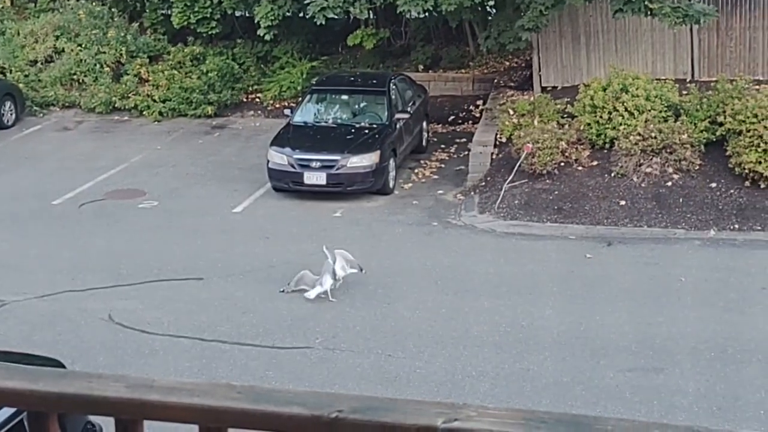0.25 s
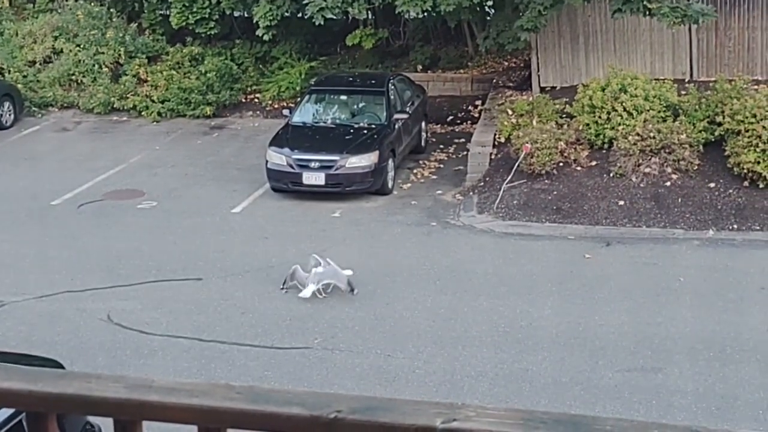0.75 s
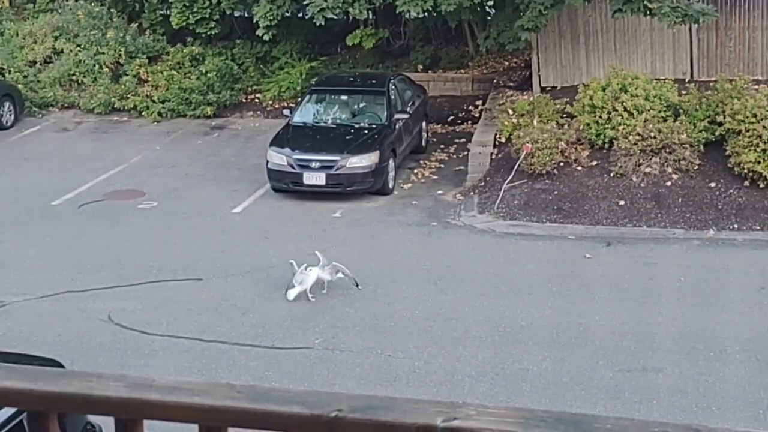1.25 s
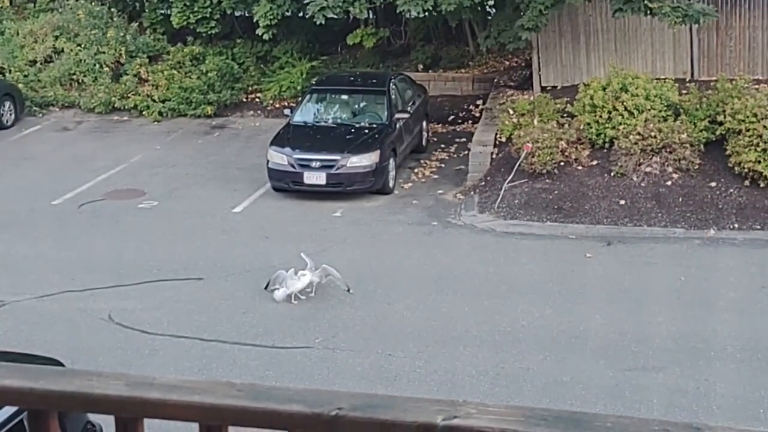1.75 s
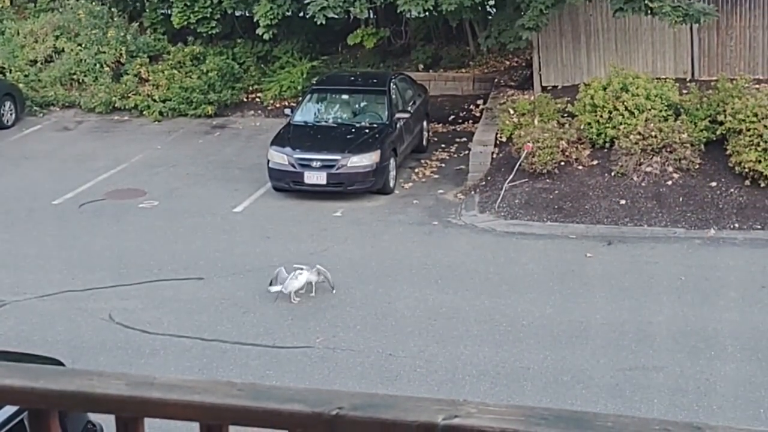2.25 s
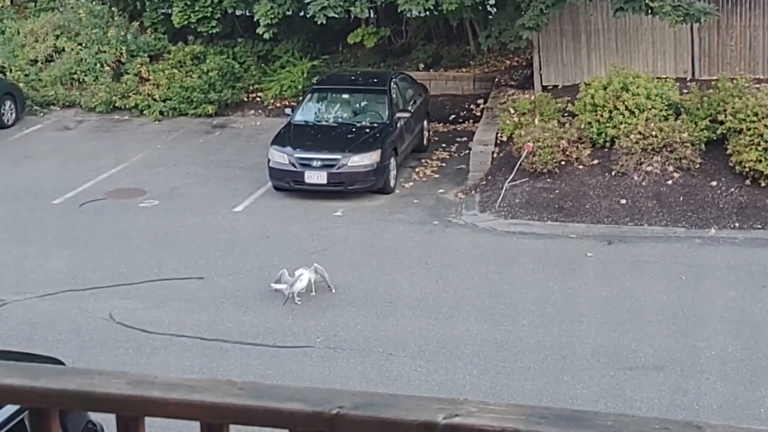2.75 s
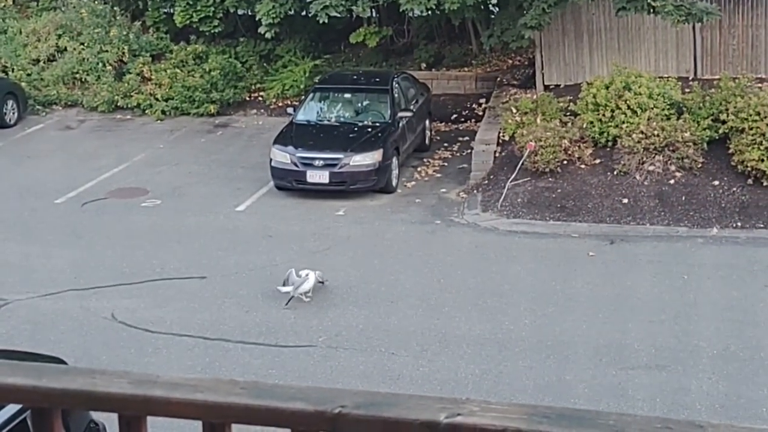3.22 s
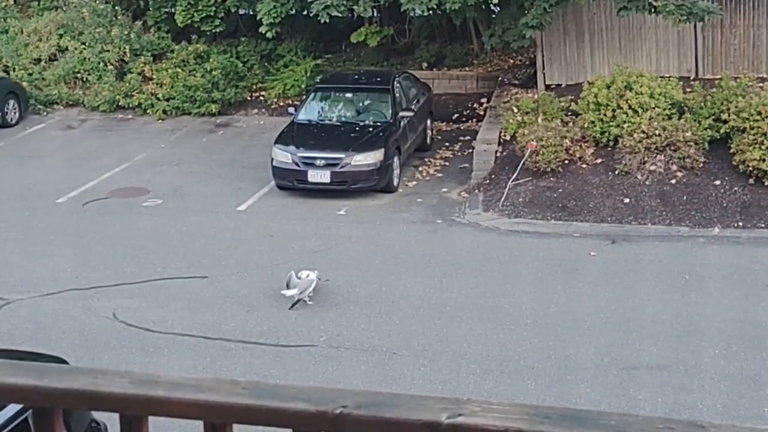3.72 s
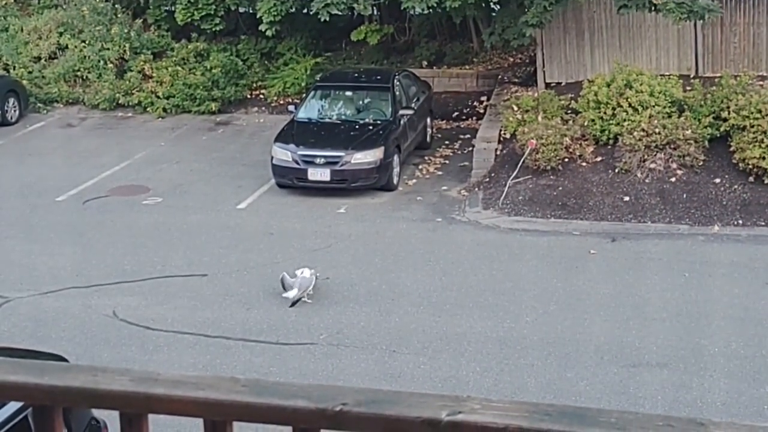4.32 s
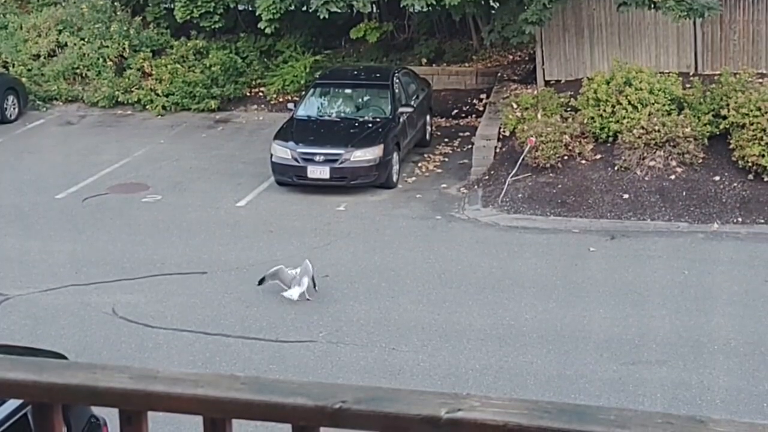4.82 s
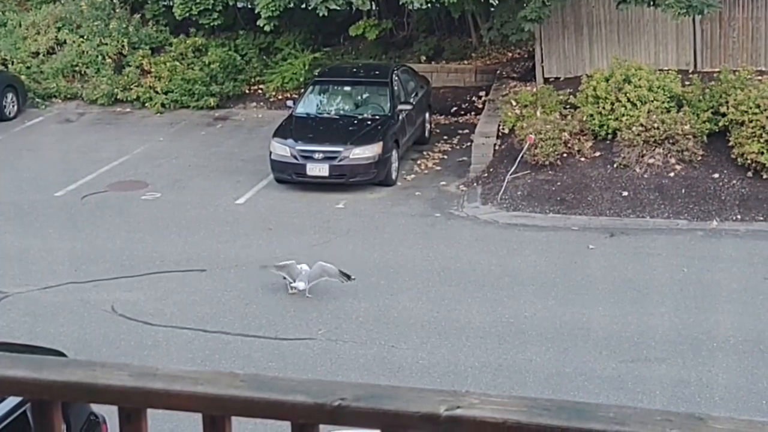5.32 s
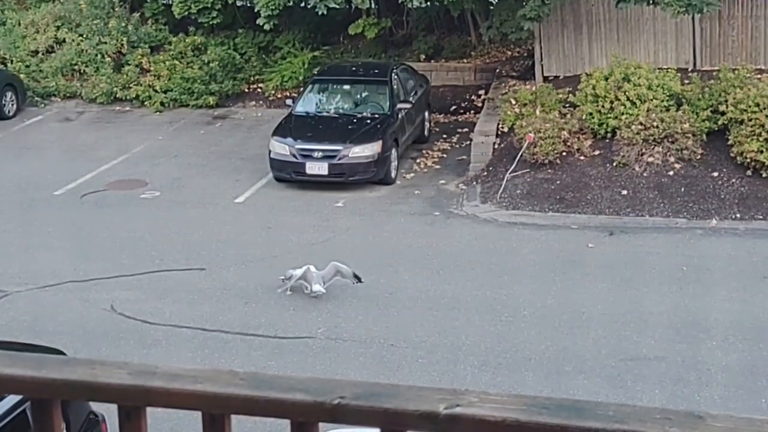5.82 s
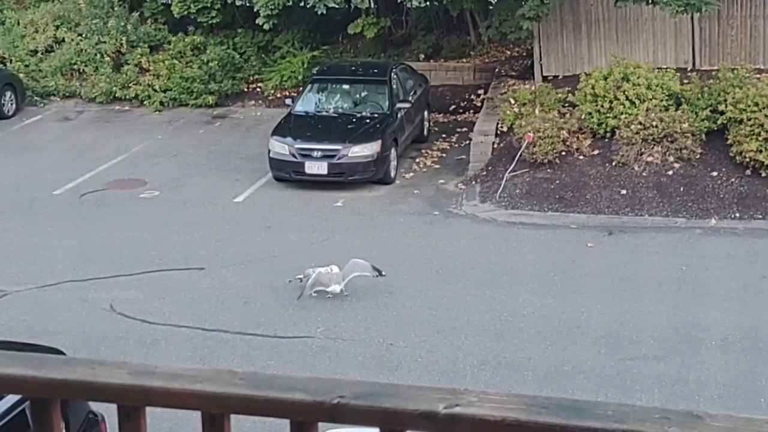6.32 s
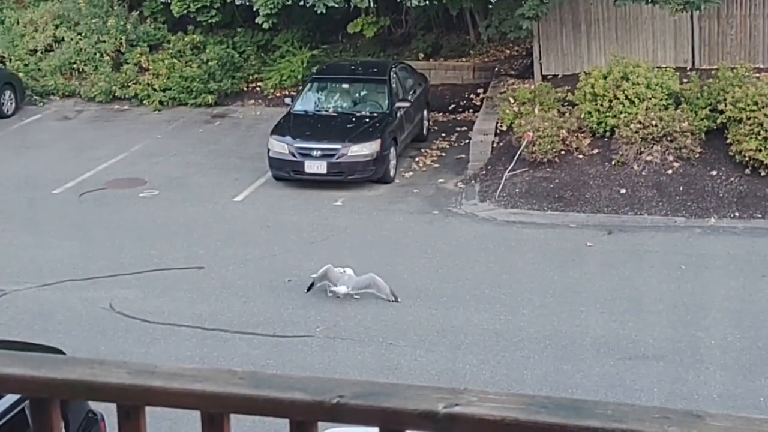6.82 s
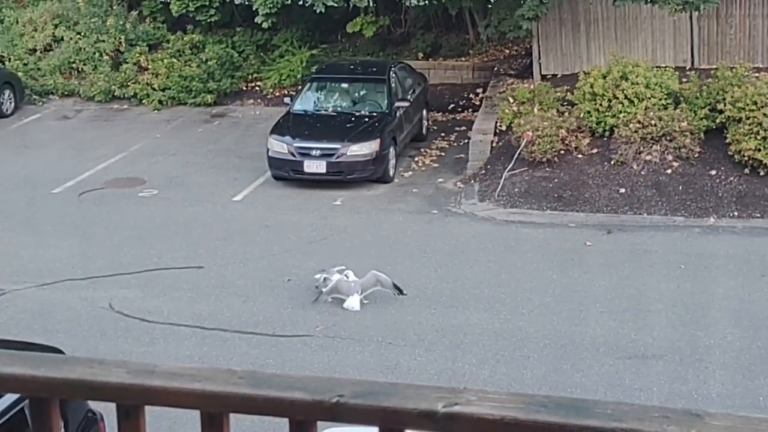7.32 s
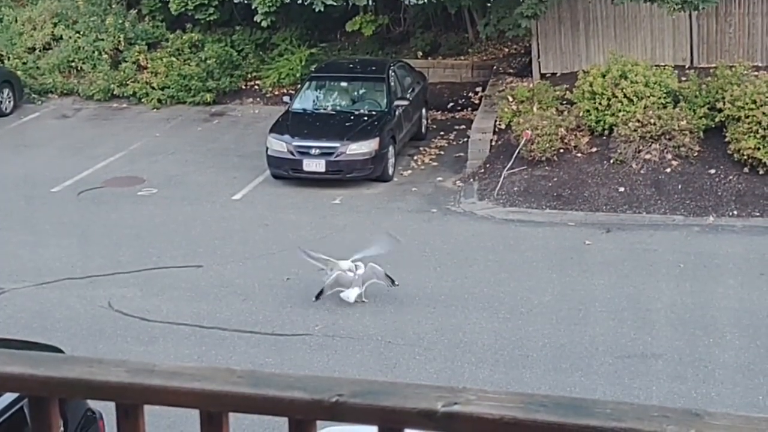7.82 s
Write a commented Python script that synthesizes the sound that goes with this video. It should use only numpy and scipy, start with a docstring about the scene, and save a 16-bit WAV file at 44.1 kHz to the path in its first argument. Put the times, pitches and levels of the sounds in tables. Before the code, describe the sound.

Outdoor stereo pickup from above a parking lot. A wing slap with a hard little knock comes first, then five separate bursts of quick gull yelps, nasal and rough at the start, dropping at the end, with short reverberant tails. Between them are quiet feather rustles, tiny bird chips and, near the end, falling whistles. Distant traffic and leaves stay very low.

```python
"""A gull yelps in runs of two or three short cries as two gulls wrestle on an asphalt lot below a balcony.
Each cry is a stack of sine lines that starts hoarse, breaks into a clean note and frays as it sinks.
Walls and fences throw it back as smeared echoes and a fading tail of noise. Small birds whistle and chip
with sliding sines, wings slap and rustle as puffs of noise, and a beak knocks as a few ringing sines.
Under it all, shaped noise makes distant traffic hum and leaves hiss."""
import sys
import numpy as np
from scipy import signal
from scipy.fft import rfft, irfft, next_fast_len
from scipy.io import wavfile
from scipy.ndimage import uniform_filter1d, map_coordinates

SR = 44100
rng = np.random.default_rng(int(sys.argv[2]) if len(sys.argv) > 2 else 0)


def dump_mix(stems):
    """Bounce the given channels to the path in sys.argv[1] as a 16-bit WAV at rate SR."""
    frames = np.atleast_2d(stems).T  # one column per channel
    limited = np.clip(frames, -1, 1)  # hard clip at full scale
    pcm = np.round(limited * 32767).astype(np.int16)
    wavfile.write(sys.argv[1], SR, pcm)


N = 355446  # samples in the scene

# Far traffic and leaves over time: t/s, traffic level/dB, leaves level/dB (both before small random drifts)
TOWN_LEVELS = [(0.0, -61, -74.5), (3.72, -59.5, -77), (8.06, -60.5, -74.5)]
# Tone colour of the traffic, only the shape counts: f/Hz, density level/dB per Hz
TRAFFIC_COLOUR = [(15, -57), (25, -24.5), (53, -14.5), (73, -6.5), (97, 1), (172, -5.5), (528, -8),
                  (592, -10.5), (1290, -13), (2570, -21), (6000, -35), (7800, -72), (13200, -120)]
# Tone colour of the leaves, only the shape counts: f/Hz, density level/dB per Hz
LEAF_COLOUR = [(2060, -19), (3500, -4.5), (5870, -7.5), (6480, -5), (10300, -7.5), (15500, -16)]
# How alike the town is on left and right, before TOWN_BALANCE: f/Hz, likeness/0-1
TOWN_LIKENESS = [(60, 0.84), (180, 0.99), (350, 0.79), (700, 0.3), (1400, 0.025)]
# Left and right balance of the town: f/Hz, left minus right level/dB, left leads by phase/rad
TOWN_BALANCE = [(45, -16, 0.56), (89, -4.5, 0.57), (178, -4, 0.19), (346, -2.5, 0.28), (1420, -5, 0.027),
                (4520, -1, 0)]
# Wing slaps and rustles: t/s, level before rise and decay/dB rms, centre f/Hz, width/octaves,
# rise time/s, time to fall 60 dB/s
WING_PUFFS = [(0.7197, -64, 6000, 1.5, 0.0011, 0.11), (.722, -53.5, 1490, 1.44, 0.0019, 0.15),
              (3.27, -71, 10000, 1, .01, 0.13), (5.051, -73, 8900, .8, 0.015, 0.42),
              (5.116, -66.5, 7100, 0.56, .006, 0.63), (6.163, -72, 9050, 1.3, 0.0037, .1),
              (7.251, -67.5, 11000, .5, .003, 0.1), (7.268, -73, 10700, .5, .003, .1),
              (8.015, -69, 7900, 0.71, .004, 0.14)]
# Ringing modes of the beak's knock: f/Hz, starting level/dB, time to fall 60 dB/s
PECK_MODES = [(840, -57, 0.079), (2080, -53, 0.054), (2730, -57, 0.045), (7600, -60, 0.011)]
# Gull cries, one a row: start t/s, length/s of the hoarse opening, clean note and sinking end,
# pitch f/Hz at the break, of the note and as it frays,
# level/dB of the note's own line at the break, in the note and as it frays,
# level/dB of the octave (2x) in the note and as it frays, base level/dB of the twelfth (3x),
# level/dB of the 1.5x line at the break and as it frays,
# level/dB of the 2.5x line at the break and in the note, noisy share of the opening/0-1
GULL_CRIES = [ (.866, 0.037, 0.01, 0.041, 1205, 1174, 1080, -50, -39.5, -44.5, -63, -62, -54.5, -51, -44, -63, -51, 1),
              (1.021, .014, 0.021, 0.05, 1150, 1166, 1085, -39.5, -36, -39.5, -44.5, -64, -47.5, -50, -43.5, -44.5, -51, 0.4),
              (2.58, .014, 0.023, 0.041, 1159, 1260, 1140, -45.5, -44, -40.5, -56, -62, -63.5, -47.5, -51.5, -57.5, -47.5, 0.45),
              (2.718, 0.028, 0.019, 0.035, 1150, 1115, 1044, -36.5, -38.5, -41.5, -52, -60, -52.5, -62, -53.5, -46, -55, 0.2),
              (2.85, 0.023, 0.019, 0.033, 1116, 1103, 980, -36.5, -37, -47, -44.5, -48.5, -48.5, -43, -48.5, -42.5, -67, .35),
              (3.708, 0.027, 0.021, 0.049, 1226, 1272, 1136, -53, -39, -41.5, -43.5, -44.5, -54.5, -45, -44, -54.5, -64, 0.62),
              (3.854, 0.033, 0.017, 0.044, 1218, 1200, 1067, -38.5, -41, -41, -37, -43, -50, -40.5, -45, -52.5, -61, 0.7),
              (3.99, .026, .012, 0.047, 1177, 1200, 1110, -38, -38.5, -39, -37.5, -42, -53, -36.5, -46, -48, -58, 0.7),
              (5.682, 0.0225, 0.0227, 0.0425, 1247, 1260, 1100, -46, -41, -45.5, -48.5, -45.5, -58, -43, -54, -52, -85, 0.44),
              (5.82, .018, 0.027, 0.029, 1223, 1175, 1136, -39.5, -46.5, -39, -47, -43.5, -57, -41.5, -47, -56.5, -75, 0.2),
              (5.952, 0.023, 0.027, 0.032, 1193, 1183, 1105, -37, -37, -39.5, -44, -43.5, -46, -38, -46, -65, -70, 0.52),
              (6.767, 0.024, 0.0087, 0.043, 1243, 1270, 1186, -50, -43.5, -46, -37.5, -45.5, -66, -48.5, -61, -49.5, -72, 0.84),
              (6.92, .022, 0.023, 0.047, 1157, 1235, 1166, -44.5, -44, -43.5, -37.5, -40.5, -52.5, -50.5, -52, -46.5, -67, 0.5),
              ]
# Further lines that follow another, mostly higher ones (0.5x follows 1.5x): multiple of the note/x, multiple of
# the line it follows/x
UPPER_LINES = [(.5, 1.5), (3.5, 2.5), (4, 3), (4.5, 2.5), (5, 3), (5.5, 2.5), (6, 3)]
# One value for each row of UPPER_LINES: level relative to the line it follows/dB
UPPER_LEVELS = [-24, -13.5, -12, -35, -18.5, -33.5, -28.5]
# Twelfth relative to its base: level/dB at start, break, note, fray and end
TWELFTH_SHAPE = [-18.5, -4.5, 0.5, -6, -21.5]
# Tone colour of the gull's breath, only the shape counts: f/Hz, density level/dB per Hz
BREATH_COLOUR = [(30, -41), (120, -28), (300, -6.5), (700, -8), (1600, -7), (3000, -14), (5000, -15.5),
                 (9000, -24), (15000, -62)]
# Left and right balance of the gull's direct sound: f/Hz, left minus right level/dB, left leads by phase/rad
GULL_BALANCE = [(150, -11, .4), (403, 13, 0.69), (1170, -9, 0.68), (1710, -1, 0.24), (2410, 0.5, 2.23),
                (3450, 3.5, 0.28), (5100, -2.5, 2.33), (6000, 1.5, 1.26)]
# Single wall echoes: delay t/s, level before each source's own offset/dB, left minus right level/dB
WALL_ECHOES = [(.012, -7, 8.5), (.03, -15, -9), (.05, -11.5, 1), (.076, -13, -5), (.13, -25.5, 1.5)]
# Fading of the yard's tail: f/Hz, time to fall 60 dB/s
YARD_FADE = [(300, 0.93), (1200, 0.66), (2500, 0.79), (5000, 0.99), (10000, 0.25)]
# Falling whistles of a small bird: t/s, length/s, top f/Hz, bottom f/Hz, level before swell and placing/dB rms
BIRD_WHISTLES = [(6.64, .068, 4600, 3050, -70), (6.768, .075, 4800, 2900, -65),
                 (6.89, .05, 4700, 3300, -74), (7.008, .06, 4800, 3400, -67),
                 (7.125, .065, 4750, 3250, -72)]
# Quick chips of a far bird: t/s, length/s, first f/Hz, last f/Hz, level before swell and echo/dB rms
BIRD_CHIPS = [(1.832, .012, 6960, 6000, -68), (4.92, 0.0046, 7960, 5660, -57),
              (7.719, 0.0098, 5660, 7600, -61.5)]

PECK_S = .7205  # time of the knock, s
FRAY_AT = 0.482  # share of the sinking end after which the half lines are back
START_PITCH, END_PITCH = .88, .89  # ratios: first pitch over that at the break; last over that as it frays
ONSET_DB, END_DB = -12, -13  # note's own line: start relative to the note; end relative to the fray
# Octave: start and break relative to its level in the note; end relative to its fray
OCTAVE_ONSET_DB, OCTAVE_BREAK_DB, OCTAVE_END_DB = -22.5, -5, -12.5
HALF_ONSET_DB, HALF_END_DB = -9, -8.5  # half lines: start relative to the break; end relative to the fray
HUSH_DB, RETURN_DB = -33, 3  # 1.5x relative to the note's line; 2.5x as it frays, over its mean
TOP_HZ = 15650  # nothing passes above this


def amp(db):
    """Turn decibels into gain."""
    return 10 ** (np.asarray(db) / 20)


def unit(x):
    """Scale x to an rms of 1."""
    return x / np.sqrt(np.mean(x ** 2) + 1e-20)


def along(points, hz):
    """Read a curve of (Hz, value) points on a log frequency axis."""
    f, v = np.transpose(points)
    return np.interp(np.log(hz + 1), np.log(f + 1), v)


def wobble(rate, size=N):
    """Draw a smooth random curve through `rate` random points a second."""
    knots = rng.standard_normal(int(size * rate / SR) + 4)
    return map_coordinates(knots, [np.arange(size) * rate / SR])


def filtered(x, response):
    """Shape x by a gain that depends on frequency."""
    m = next_fast_len(x.shape[-1] + SR // 2)
    spectrum = rfft(x, m) * response(np.fft.rfftfreq(m, 1 / SR))
    return irfft(spectrum, m)[..., :x.shape[-1]]


def sided(x, balance):
    """Make two microphone ports differ in level and phase by frequency, half the difference each."""
    hz, db, lead = np.transpose(balance)

    def half(f, values):
        return np.outer([.5, -.5], along(np.transpose([hz, values]), f))

    return filtered(x, lambda f: amp(half(f, db)) * np.exp(1j * half(f, lead)))


def add(track, s, sound):
    """Mix a sound into the track at s seconds."""
    part = track[..., round(s * SR):][..., :sound.shape[-1]]
    part += sound[..., :part.shape[-1]]


def yard(x, wall_db, tail_db):
    """A few walls answer, each smeared by its rough face, and a diffuse tail dies at its own rate by frequency."""
    size = SR // 2
    hz, t, z = signal.stft(rng.standard_normal((2, size)), SR, nperseg=256)
    fading = z * amp(-60 * t / along(YARD_FADE, hz)[:, None])
    tail = signal.istft(fading, SR, nperseg=256)[1][:, :size]
    tail = tail * np.clip(np.arange(size) / SR / 0.024, 0, 1)  # scattered sound builds up over 24 ms
    answer = amp(tail_db) * tail / np.linalg.norm(tail[0])
    for delay, db, side_db in WALL_ECHOES:
        smear = rng.standard_normal((2, 1300)) * amp(-60 * np.arange(1300) / SR / .03)
        gain = amp(wall_db + db + side_db * np.array([[.5], [-.5]]))
        add(answer, delay, gain * smear / np.linalg.norm(smear[0]))
    dull = filtered(answer, lambda f: 1 / np.sqrt(1 + (f / 5000) ** 2))  # leaves and air eat the treble
    echo = signal.fftconvolve(x[None], dull, axes=1)
    flutter = np.array([wobble(120, size=echo.shape[1]) for _ in echo])  # from stirring air and leaves
    return echo * amp(2.5 * flutter)


def rush(colour, patchy_db):
    """Shape stereo noise by a tone colour, with patches of random gain, to an rms of 1."""
    z = signal.stft(rng.standard_normal((2, N)), nperseg=512)[2]
    patches = uniform_filter1d(rng.standard_normal(z.shape[1:]), 6, 0)
    patches = unit(uniform_filter1d(patches, 10, 1))
    pair = signal.istft(z * amp(patchy_db * patches), nperseg=512)[1][:, :N]

    def shape(hz):
        # More shared noise where the two sides are more alike
        turn = np.arccos(np.clip(along(TOWN_LIKENESS, hz), -1, 1)) / 2
        return amp(along(colour, hz)) * [np.cos(turn), np.sin(turn)]

    mid, side = filtered(pair, shape)
    return unit(sided(np.array([mid + side, mid - side]), TOWN_BALANCE))


def town():
    """Far traffic hums as mostly low noise; leaves hiss as high noise in a light, uneven breeze."""
    s, traffic_db, leaves_db = np.transpose(TOWN_LEVELS)
    t = np.arange(N) / SR
    traffic_gain = amp(np.interp(t, s, traffic_db) + .5 * wobble(3))
    leaves_gain = amp(np.interp(t, s, leaves_db) + .5 * wobble(6) + .5 * wobble(25))
    traffic = traffic_gain * rush(TRAFFIC_COLOUR, patchy_db=.5)
    leaves = leaves_gain * rush(LEAF_COLOUR, patchy_db=.6)
    return traffic + leaves


def wings():
    """Each slap or rustle is a grainy puff of noise round its centre frequency, quick to rise and then dying."""
    out, t = np.zeros((2, N)), np.arange(SR // 3) / SR
    for s, db, hz, octaves, rise, t60 in WING_PUFFS:
        shared, own = rng.standard_normal(len(t)), rng.standard_normal((2, len(t)))
        puff = unit(filtered(shared + own, lambda f: np.exp(-(np.log2((f + 1) / hz) / octaves) ** 2)))
        grain_db = 1.4 * wobble(300, size=len(t))
        add(out, s, puff * amp(db - 60 * t / t60 + grain_db) * np.clip(t / rise, 0, 1))
    return out


def peck():
    """A beak knocks something hard: a few short modes ring and die, and the walls answer."""
    out, t = np.zeros((2, N)), np.arange(SR // 8) / SR
    ring = 0
    for hz, db, t60 in PECK_MODES:
        fade = amp(db - 60 * t / t60 + 2 * wobble(200, size=len(t)))
        ring = ring + fade * np.sin(2 * np.pi * hz * t)
    add(out, PECK_S, ring * amp([[-1.5], [1.5]]))  # a little to the right
    add(out, PECK_S, yard(ring, wall_db=0.0, tail_db=-11.0))
    return out


def stages(start, opening, hold, sink, break_hz, note_hz, fray_hz, break_db, note_db, fray_db,
           octave_db, octave_fray_db, twelfth_db, low_db, low_fray_db, high_db, high_note_db):
    """Give time, pitch and levels of the 1, 1.5, 2, 2.5 and 3x lines at start, break, note, fray and end."""
    high_fray_db = (high_db + high_note_db) / 2 + RETURN_DB
    return (start + np.cumsum([0, opening, hold, FRAY_AT * sink, (1 - FRAY_AT) * sink]),
            [START_PITCH * break_hz, break_hz, note_hz, fray_hz, END_PITCH * fray_hz],
            [note_db + ONSET_DB, break_db, note_db, fray_db, fray_db + END_DB],
            [low_db + HALF_ONSET_DB, low_db, note_db + HUSH_DB, low_fray_db, low_fray_db + HALF_END_DB],
            [octave_db + OCTAVE_ONSET_DB, octave_db + OCTAVE_BREAK_DB, octave_db,
             octave_fray_db, octave_fray_db + OCTAVE_END_DB],
            [high_db + HALF_ONSET_DB, high_db, high_note_db, high_fray_db, high_fray_db + HALF_END_DB],
            twelfth_db + np.array(TWELFTH_SHAPE))


def cry(row, hoarse, jitter=0.003, breath_db=-26, puff_db=-25):
    """A hoarse low opening (lines halfway between overtones) breaks into a clean note that frays as it sinks."""
    s, hz, *line_db = stages(*row)
    steps = np.arange(len(s))
    t = np.arange(s[0], s[-1], 1 / SR)
    place = np.interp(t, s, steps)  # 0 start, 1 break, 2 note, 3 fray, 4 end

    late = np.where(place < 1, place ** 3, place)  # whole overtones leap in at the break
    after_break = (place > 1) & (place < 2)
    early = np.where(after_break, 1 + np.abs(place - 1) ** .5, place)  # half lines die just after it
    level = {}  # dB over time, by multiple of the note
    for k, stage_db in zip([1, 1.5, 2, 2.5, 3], line_db):
        level[k] = uniform_filter1d(np.interp(early if k % 1 else late, steps, stage_db), 90)
    level.update({k: level[lower] + db for (k, lower), db in zip(UPPER_LINES, UPPER_LEVELS)})

    rough = hoarse * np.interp(place, [0, .9, 1.1, 2.7, 3.3, 4], [1, 1, .03, .03, .35, .8])
    climb = np.where(place < 1, place ** .65, place)  # the pitch climbs fastest at the start
    pitch = uniform_filter1d(np.interp(climb, steps, hz), 400)
    phase = 2 * np.pi * np.cumsum(pitch * (1 + jitter * wobble(158, size=len(t)))) / SR

    voice = 0
    for k, db in level.items():
        # Noisy share of this line: the half lines and the high lines get more
        share = np.clip(rough * (.5 if k == 1 else .9) + .06 * (k % 1 > 0) + .08 * (k > 3.5), 0, 1)
        # Uneven slaps blur the line
        scatter = (wobble(600, size=len(t)) + 1j * wobble(600, size=len(t))) / np.sqrt(2)
        shape = np.sqrt(1 - share) + np.sqrt(share) * scatter
        turning = np.exp(1j * (k * phase + rng.uniform(0, 2 * np.pi)))
        voice = voice + amp(db) * (shape * turning).imag

    air = unit(filtered(rng.standard_normal(len(t)), lambda f: amp(along(BREATH_COLOUR, f))))
    puffs = 1 + np.cos(phase / 2)  # one puff per pair of slaps
    air = air * puffs * (amp(breath_db) + amp(puff_db) * rough)
    edge = np.clip(np.minimum(t - s[0], s[-1] - t) / 0.005, 0, 1)  # 5 ms fades
    return edge * (np.sqrt(2) * voice + amp(level[1]) * air)


def gull():
    """Every cry arrives direct and again from the walls."""
    out = np.zeros((2, N))
    for *row, hoarse in GULL_CRIES:
        voice = cry(row, hoarse)
        add(out, row[0], sided(voice, GULL_BALANCE))
        add(out, row[0], yard(voice, wall_db=-1.5, tail_db=-14.0))
    return out


def glide(length, hz0, hz1, bend):
    """A slightly fluttering sine holds near hz0, slides, and eases into hz1 as it fades."""
    u = np.arange(round(length * SR)) / (length * SR)  # 0 to 1 through the note
    slide = u ** bend / (u ** bend + 1.4 * (1 - u) ** bend)
    swell = np.sin(np.pi * u ** 0.81) * amp(3.5 * wobble(116, size=len(u)))
    phase = 2 * np.pi * np.cumsum(hz0 + (hz1 - hz0) * slide) / SR
    return np.sqrt(2) * swell * np.sin(phase)


def songbirds():
    """Sliding sines: whistles from the left, and chips from far off heard only by way of the walls."""
    out = np.zeros((2, N))
    for s, length, hz0, hz1, db in BIRD_WHISTLES:
        note = amp(db) * glide(length, hz0, hz1, bend=1.8)
        add(out, s, note * amp([[2.5], [-2.5]]))
        add(out, s, yard(note, wall_db=-2, tail_db=-3))
    for s, length, hz0, hz1, db in BIRD_CHIPS:
        chip = amp(db) * glide(length, hz0, hz1, bend=1.26)
        add(out, s, yard(chip, wall_db=5.5, tail_db=3))
    return out


def scene():
    """Add up everything that reaches the balcony."""
    return town() + wings() + peck() + gull() + songbirds()


def record(dry, open_db=-52, lift_db=4.5, bass_hz=750):
    """A noise suppressor holds the bass down until a loud sound opens it; sub-bass and the very top are cut."""
    power = np.abs(uniform_filter1d(np.mean(dry ** 2, axis=0), 1500))
    opening = power ** 2 / (power ** 2 + amp(open_db) ** 4)  # 0 shut, 1 open, half open at open_db
    bass = filtered(dry, lambda hz: 1 / (1 + (hz / bass_hz) ** 8))
    lifted = dry + (amp(lift_db * opening) - 1) * bass
    return filtered(lifted, lambda hz: (hz < TOP_HZ) * hz ** 2 / (hz ** 2 + 30 ** 2))


dry = scene()
out = record(dry)
dump_mix(out)
```